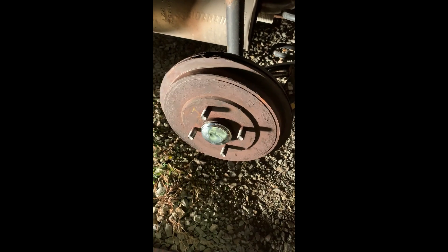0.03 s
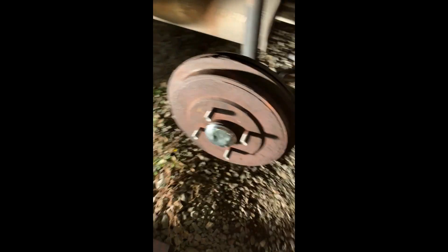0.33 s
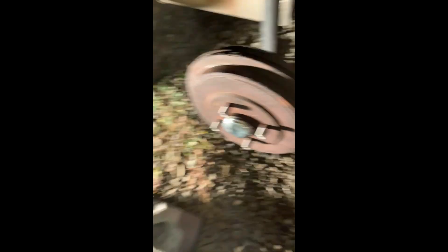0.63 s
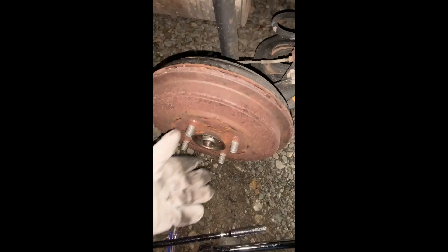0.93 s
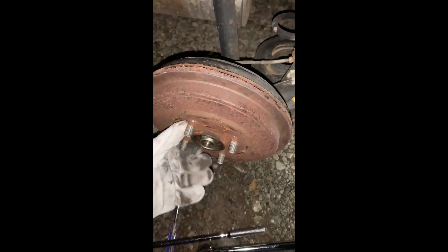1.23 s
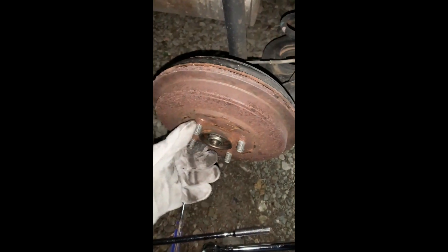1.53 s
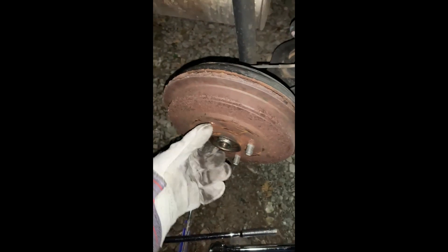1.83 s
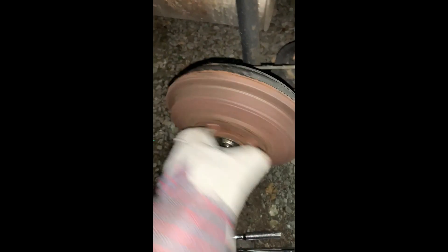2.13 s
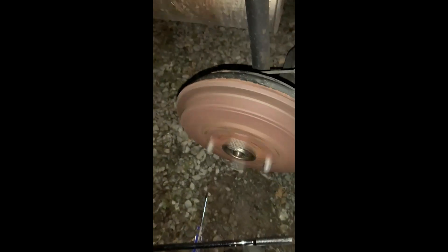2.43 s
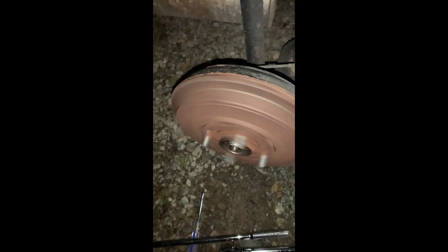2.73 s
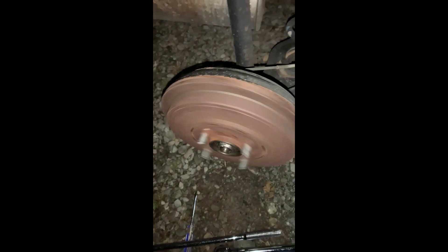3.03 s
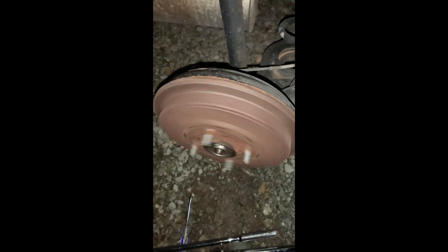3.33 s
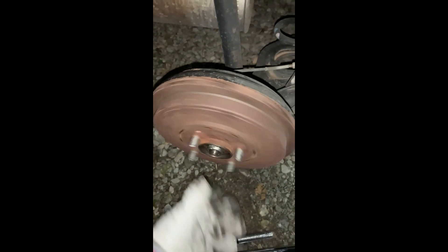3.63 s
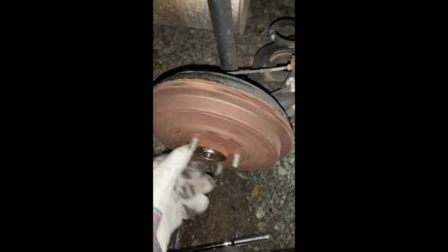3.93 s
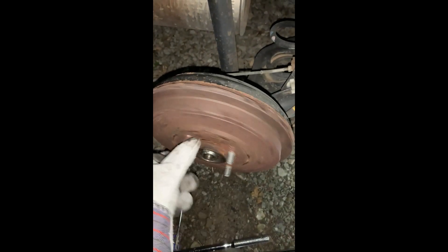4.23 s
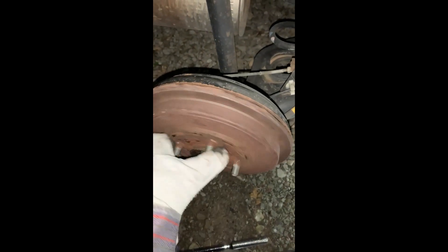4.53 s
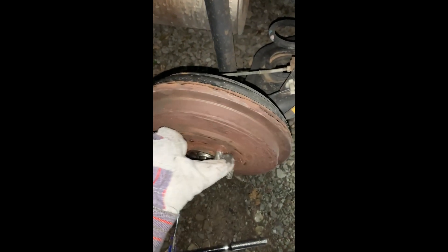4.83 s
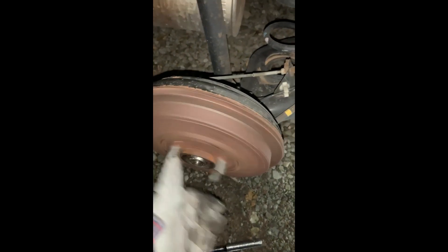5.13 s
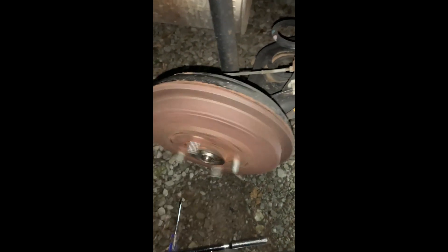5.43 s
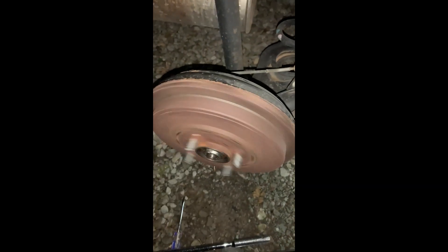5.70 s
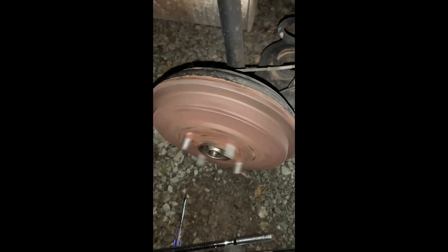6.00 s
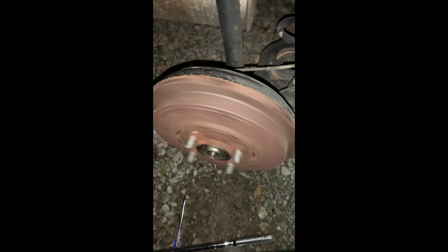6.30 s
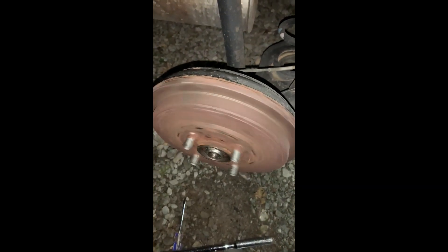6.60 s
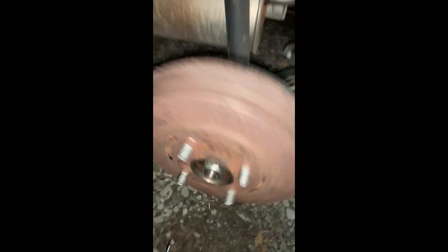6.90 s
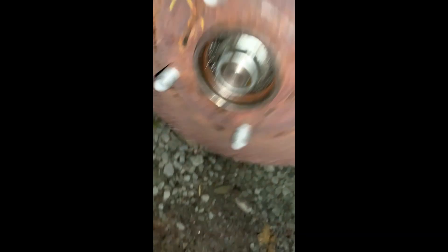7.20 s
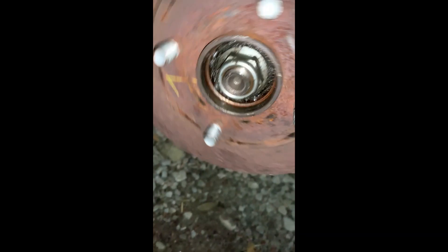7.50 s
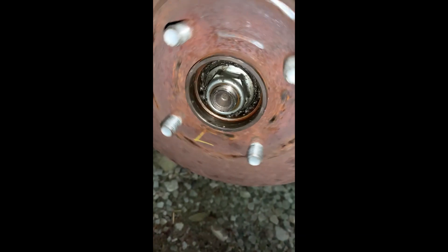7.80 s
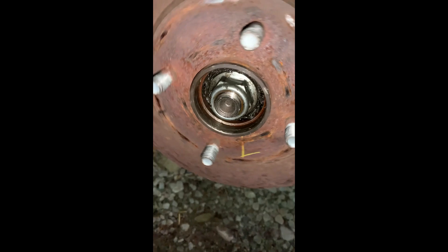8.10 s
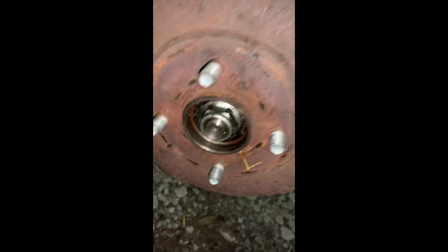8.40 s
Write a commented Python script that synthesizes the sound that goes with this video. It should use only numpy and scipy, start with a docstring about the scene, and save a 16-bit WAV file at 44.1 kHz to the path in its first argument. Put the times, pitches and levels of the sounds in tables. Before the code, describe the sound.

A worn wheel bearing growls and crunches through two fading spins, the brake drum scraping and squeaking between glove rustles.

```python
"""Outdoors, a phone's two microphone ports close to a wheel hub; far off, a drone, traffic and a motor.
A rusty brake drum on a worn bearing is spun twice by hand. The rollers rumble over pitted races,
shake the hub and crunch rust; the drum catches on the brake shoes, rasps, squeaks and rings.
Near the microphone a work glove and sleeve rustle among short clicks; ground and wheel arch scatter
the sound back. Three times the sound cuts out for an instant; near the end the phone is handled."""
import sys
import numpy as np
from scipy import signal
from scipy.fft import rfft, irfft, next_fast_len
from scipy.io import wavfile
from scipy.ndimage import uniform_filter1d

SR = 44100
rng = np.random.default_rng(int(sys.argv[2]) if len(sys.argv) > 2 else 0)


def dump_mix(stems):
    """Bounce the given channels to the path in sys.argv[1] as a 16-bit WAV at rate SR."""
    frames = np.atleast_2d(stems).T  # one column per channel
    limited = np.clip(frames, -1, 1)  # hard clip at full scale
    pcm = np.round(limited * 32767).astype(np.int16)
    wavfile.write(sys.argv[1], SR, pcm)


N = 377055
TIME = np.arange(N) / SR

# Far drone and traffic over time: time_s, drone_db, traffic_db
FAR_LEVELS = [(0, -44.5, -51.5), (.93, -49.5, -56), (1.0, -54.5, -65.5), (4.6, -52, -61),
              (6.599, -50.5, -62.5), (7.899, -49.5, -73), (8.55, -59, -61.5)]
# Colour of the drone: freq_hz, gain_db
DRONE_COLOUR = [(15, -5), (32, -10), (55, -9), (85, -4.5), (140, -9), (200, -15.5), (280, -35),
                (450, -30.5), (800, -73.5)]
# Tones in the drone: pitch_hz, width_hz, boost_db
DRONE_TONES = [(58.35, 4.4, 12.5), (338, 9.7, 13.5)]
# Colour of far traffic: freq_hz, gain_db
TRAFFIC_COLOUR = [(200, 12.5), (400, -5.5), (620, -2), (800, -1), (1100, 1), (1800, -3.5), (2500, -14.5),
                  (5000, -27), (16000, -33)]
# Partials of the far motor: pitch_hz, relative_db
MOTOR_PARTIALS = [(59.2, -54), (118.4, -67), (360.7, -77.5)]
# The motor's hum grows: time_s, gain_db
MOTOR_SWELL = [(0, -11), (4.8, -10), (7.6, 4)]

# The sleeve slides (rise and fall span 20 dB): full_speed_s, rise_s, hold_s, fall_s, hiss_db, swish_db
ARM_MOVES = [(0.522, 0.083, 0.034, 0.11, -49, -64), (0.634, 0.096, 0.045, 0.063, -47, -65),
             (1, 0.033, 0.12, 0.12, -55, -84), (1.754, 0.36, 0.13, 0.18, -67, -68.5),
             (2.153, 0.21, .025, .05, -49.5, -62.5), (2.257, 0.082, 0.13, 0.75, -46, -56),
             (3.571, 0.14, 0.057, 0.49, -47, -55.5), (3.992, 0.015, 0.011, 0.31, -50.5, -81),
             (4.232, 0.021, 0.0086, 0.18, -49.5, -57), (4.612, 0.14, .02, 0.22, -47.5, -57),
             (5.138, 0.16, 0.022, 0.23, -42, -55), (5.332, 0.16, 0.093, 0.35, -46.5, -51.5),
             (6.884, 0.082, 0.18, 0.25, -47.5, -57), (7.147, 0.27, 0.038, 0.26, -41, -49.5),
             (7.381, 0.11, 0.054, 0.13, -53, -59.5), (8.375, 0.21, .2, .2, -47.5, -56.5)]
# Colour of the sleeve's hiss: freq_hz, gain_db
HISS_COLOUR = [(120, 15.5), (350, 3.5), (700, -2), (1300, -5), (2200, 0.5), (4000, 5), (8000, 1),
               (12000, 2.5), (16000, 3)]
# Colour of its dull swish: freq_hz, gain_db
SWISH_COLOUR = [(200, 1), (400, 4.5), (750, -3.5), (1300, 0.5), (1800, -1), (2600, -11), (5000, -17),
                (16000, -41)]
# Short clicks, one sharp as the sound cuts back in: start_s, length_s, body_db, treble_db
CLICKS = [(0.36, 0.046, -62, -58.5), (0.461, 0.013, -56, -66), (0.514, 0.0068, -52, -58),
          (0.588, .0047, -55, -44), (0.636, 0.0076, -56, -62), (0.666, 0.039, -56.5, -72),
          (2.629, 0.011, -58, -45.5), (2.67, 0.012, -44, -41), (2.7295, 0.006, -24, -35.5),
          (2.886, 0.018, -37, -44), (2.91, 0.0015, -55, -39), (3.508, 0.0047, -36, -42),
          (3.617, 0.0044, -53, -41), (3.991, 0.011, -56, -54), (4.028, .006, -53, -43.5),
          (4.052, 0.0014, -56, -50), (4.117, 0.004, -43, -46.5), (4.1227, 0.0058, -29, -33),
          (5.192, 0.0011, -28, -29.5), (6.064, 0.0041, -62, -48), (6.599, 0.0026, -47.5, -46.5),
          (6.683, 0.012, -86, -63.5), (6.859, 0.0072, -54, -48.5), (6.952, 0.0024, -49, -62),
          (7.144, 0.022, -45, -44.5), (7.263, 0.0064, -54, -42.5), (8.129, 0.0033, -54.5, -36.5)]
# Dull knocks of the loose hub and of handling: start_s, pitch_hz, peak_db, t60_s
KNOCKS = [(2.352, 237, -17.5, 0.015), (2.766, 125, -23, 0.11), (3.295, 241, -18.5, 0.031),
          (3.416, 216, -35, 0.091), (5.206, 135, -19.5, 0.13), (6.826, 573, -40.5, 0.052),
          (6.954, 516, -26.5, 0.0068), (6.969, 62, -23.5, 0.11), (8.436, 422, -44, 0.047)]

# The drum sings faintly in the first second: start_s, length_s, pitch_hz, width_hz, level_db
FAINT_TONES = [(0.019, 0.33, 1048, 12.2, -61), (.15, .14, 834, 15, -68), (.15, 0.35, 1560, 52, -70.5),
               (.27, .08, 1140, 66, -66), (.46, .07, 1135, 60, -62), (.57, 0.26, 1125, 50, -63.5),
               (0.782, 0.078, 1050, 20, -63), (0, 0.088, 5520, 120, -70), (0, 0.069, 7100, 300, -69)]
# The drum rubs a shoe (relative levels): start_s, length_s, rasp_db, treble_db, mode_push_db
SCRAPES = [(2.685, 0.055, -31, -28, -56), (2.725, 0.02, -26.5, -41, -54), (2.76, 0.01, -31.5, -37, -40),
           (3.476, 0.014, -45, -37, -48), (3.512, 0.018, -36.5, -36.5, -35.5),
           (3.613, 0.025, -41, -43, -41.5), (5.485, 0.005, -46, -36, -50),
           (5.527, 0.009, -39, -32.5, -35.5), (6.212, 0.027, -34, -37, -40.5),
           (6.273, 0.018, -39, -42.5, -50), (6.308, 0.12, -51, -45.5, -48), (6.383, 0.023, -33, -34.5, -47),
           (6.455, 0.032, -36.5, -39.5, -37.5)]
# Colour of the rasp: freq_hz, gain_db
RASP_COLOUR = [(250, -2.5), (500, -5.5), (780, 0), (1200, 0), (1400, -6), (2300, -0.5), (3000, -4),
               (3900, -6), (5000, -42.5), (9000, -54)]
# Colour of the rasp's treble: freq_hz, gain_db
RASP_TREBLE = [(2500, -60.5), (4200, 21), (7000, 5), (11000, 4.5), (15500, 1)]
# Resonances of shoes and backing plate: pitch_hz, width_hz, boost_db
PLATE_MODES = [(618, 60, 13), (833, 42, 11), (920, 81, 11.5), (1143, 80, 10), (1580, 70, 13), (1915, 80, 7),
               (2130, 70, 4), (2700, 52, 6.5), (3040, 90, 4.4), (3700, 70, 6), (3850, 73, 9.5),
               (4700, 60, 9), (5835, 72, 15), (6280, 79, 13), (7020, 110, 20), (8430, 150, 21),
               (9740, 130, 23), (11177, 100, 10), (12720, 160, 11), (15500, 160, 8)]
# The iron drum is not quite round, so each mode has a twin: pitch_hz, gain_db, t60_s, twin_offset_hz
DRUM_MODES = [(832, -5, .25, 4), (1057, -7, .65, 2), (1437, -12, .82, 1), (1599, -15, .3, 8),
              (1949, -11, .2, 11), (2083, -4, .66, 5.2), (2730, -13, .3, 9), (2848, -12, .35, 9),
              (3040, -7, .12, 30), (3722, -1, .15, 19), (3890, -5, .1, 33), (4735, 0, .11, 14),
              (5831, -9, .13, 4), (6190, -13, .08, 40), (7020, -5, .1, 24), (8323, 0, .09, 16),
              (9709, -7, .09, 18), (11177, -8, .12, 8), (12720, -14, .08, 25), (14346, -7, .09, 12)]
# Friction locks onto one drum mode: start_s, hold_s, pitch_hz, relative_db
SQUEAKS = [(2.685, 0.012, 3722, -29), (2.687, 0.0074, 2083, -38), (2.69, 0.018, 1057, -36.5),
           (2.688, 0.018, 7020, -32), (2.689, .009, 11177, -34.5), (2.727, .012, 4735, -28.5),
           (2.726, 0.013, 11177, -32.5), (2.718, 0.012, 5831, -36.5), (2.732, 0.038, 7020, -39),
           (2.735, 0.0091, 2083, -51.5), (2.771, 0.013, 5831, -40.5), (2.785, 0.02, 2848, -44.5),
           (2.755, .02, 11177, -47), (2.76, .012, 8323, -45), (2.916, .008, 2083, -58),
           (3.481, .012, 4735, -39), (3.482, 0.0067, 2083, -42.5), (3.509, 0.0094, 7020, -38.5),
           (3.516, 0.018, 5831, -40), (3.508, 0.0086, 3040, -36.5), (3.51, 0.011, 8323, -49),
           (3.518, .012, 2083, -48), (3.617, .012, 4735, -33), (3.62, .012, 1437, -57),
           (3.64, .02, 2848, -52), (5.53, 0.0092, 5831, -31), (5.526, 0.012, 9709, -35.5),
           (5.528, .012, 8323, -43), (5.529, 0.0097, 1437, -39.5), (5.53, 0.005, 2083, -36),
           (6.214, 0.026, 8323, -37), (6.217, 0.0098, 1057, -45.5), (6.23, .014, 2083, -46.5),
           (6.221, 0.013, 1437, -47), (6.312, 0.0066, 7020, -48.5), (6.39, 0.028, 14346, -49),
           (6.384, 0.012, 3890, -39), (6.457, .014, 4735, -35), (6.459, 0.018, 14346, -50),
           (6.475, 0.025, 5831, -48.5), (6.49, 0.028, 1437, -46)]

# Grit crackles while the drum turns fast: start_s, length_s, level_db
GRIT_FLURRIES = [(2.995, 0.0078, -55), (3.055, 0.012, -54.5), (3.131, 0.012, -56), (3.219, 0.01, -54.5),
                 (3.244, 0.012, -56), (3.276, 0.012, -55.5), (3.344, 0.011, -58), (3.404, .008, -59),
                 (5.709, 0.013, -52), (5.823, .006, -55), (5.842, 0.0063, -56), (5.923, 0.019, -53),
                 (6.081, 0.011, -53.5)]
# Colour of the grit: freq_hz, gain_db
GRIT_COLOUR = [(1200, -15), (2500, 2), (4500, 3), (6500, -3), (11000, -4.5), (16000, -20)]
# Resonances of the races: pitch_hz, width_hz, boost_db
RACE_MODES = [(4991, 120, 15), (6450, 270, 8.5), (11000, 120, 11)]
# A roller crushes a flake of rust: start_s, length_s, level_db
CRUNCHES = [(2.347, .01, -38.5), (2.365, 0.033, -38.5), (2.418, 0.0081, -43), (2.455, 0.023, -41.5),
            (2.55, 0.016, -41), (2.977, 0.0087, -44), (3.294, 0.0094, -44), (5.259, 0.0079, -41),
            (5.321, 0.029, -42), (5.389, 0.023, -39), (5.449, 0.0072, -44), (5.648, 0.0099, -35),
            (5.712, 0.0088, -34.5), (5.898, 0.017, -35.5), (5.922, 0.015, -32.5)]
# Colour of a crunch: freq_hz, gain_db
CRUNCH_COLOUR = [(250, -15), (450, 4.5), (800, 7), (1300, -8), (2400, -1), (3500, -17.5), (6000, -30.5),
                 (16000, -37.5)]
# The hand spins the drum: full_speed_s, slowing_s, caught_s, rumble_db, shudder_db, fade_db_per_s
SPINS = [(2.24, 2.72, 3.9, -34, -37.5, 12), (5.163, 6.073, 8.2, -32.5, -35, 40.5)]
# Low swells (the bearing growls; near the end the phone is handled): start_s, length_s, level_db
RUMBLE_SWELLS = [(2.238, 0.064, -36.5), (2.333, 0.13, -27.5), (2.45, 0.06, -26), (2.555, 0.028, -27),
                 (2.747, 0.053, -28), (2.866, 0.053, -32), (2.917, 0.045, -28), (2.971, 0.039, -28.5),
                 (3.023, 0.057, -35.5), (3.279, 0.041, -27.5), (3.328, 0.04, -32.5), (3.405, 0.031, -31.5),
                 (3.746, 0.038, -42.5), (5.202, 0.031, -23.5), (5.254, 0.032, -31.5), (5.292, 0.082, -26),
                 (5.399, 0.075, -25), (5.622, 0.062, -28), (5.694, 0.051, -23), (5.837, 0.14, -29),
                 (5.916, 0.046, -23), (6.03, 0.028, -34.5), (6.07, 0.05, -39.5), (6.303, 0.017, -32.5),
                 (6.683, 0.024, -54.5), (7.146, 0.065, -45), (7.244, 0.088, -48.5), (7.411, 0.089, -66)]
# How the hub passes the rumble on: freq_hz, gain_db
HUB_COLOUR = [(90, -11.5), (150, -10.5), (200, -5), (240, -0.5), (300, -6), (345, -15), (400, -13),
              (460, -21.5), (900, -28.5), (1250, -37), (2200, -42), (4000, -53.5), (8000, -82.5),
              (16000, -97.5)]
# Resonances of the hub: pitch_hz, width_hz, boost_db
HUB_MODES = [(228, 36, 6.5), (283, 40, 7), (362.2, 27, 11), (615, 89, 6.5), (832, 27, 10.9), (916, 62, 8.5),
             (1052, 22, 11), (1215, 60, 5.3)]
# Colour of the axle's shudder: freq_hz, gain_db
AXLE_COLOUR = [(15, -47), (28, -24.5), (42, 8), (60, 6.5), (100, 4), (140, 6.5), (168, 3.5), (195, -10),
               (300, -56.5)]

# Phase by which the left microphone port leads the right: freq_hz, lead_rad
PORT_LEAD = [(0, 0), (60, -.2), (250, -.35), (500, -.7), (1100, -1.2), (1550, .9), (2100, 1.45),
             (3400, 1.4), (4750, 3.14), (6500, 6.1), (7300, 6.5), (8950, 9.42), (10700, 12.4),
             (11600, 12.7), (13200, 15.7), (14900, 18.8), (16000, 18.8)]
# Level at the left port minus the right: freq_hz, balance_db
PORT_BALANCE = [(50, -1), (170, 2), (350, 0), (700, -1.5), (1400, -2), (2100, -4), (2800, -0.5), (5000, 0)]
# The sound cuts out: start_s, end_s
DROPOUTS = [(.942, .996), (2.842, 2.864), (2.888, 2.914)]


def undb(db):
    """Decibels to gain."""
    return 10 ** (np.asarray(db) / 20)


def unit(x):
    """Scale to rms 1."""
    return x / np.sqrt(np.mean(x ** 2) + 1e-18)


def smooth(x, first, second):
    """Two moving averages, their sizes in samples."""
    return uniform_filter1d(uniform_filter1d(x, first), second)


def steady(x, span_s):
    """Hold the rms near 1 over the given span, leaving faster flutter."""
    power = smooth(x ** 2, int(span_s * SR), int(span_s * SR / 2))
    return x / np.sqrt(np.abs(power) + 1e-12)


def add(track, start_s, sound):
    """Mix a sound into the track."""
    i = max(int(start_s * SR), 0)
    track[i:i + len(sound)] += sound[:N - i]


def body(x, colour, modes=()):
    """Causal filter of unit power from (freq_hz, gain_db) points and resonances."""
    size = 2 * next_fast_len(N // 2 + SR // 2)
    freq = np.arange(size // 2 + 1) * SR / size
    hz, db = np.transpose(colour)
    curve_db = np.interp(np.log(freq + 1), np.log(hz), db)
    curve_db += sum(boost / (1 + (2 * (freq - pitch) / width) ** 2) for pitch, width, boost in modes)
    cepstrum = irfft(np.log(unit(undb(curve_db))))
    cepstrum[1:size // 2] *= 2  # fold to minimum phase
    cepstrum[size // 2 + 1:] = 0
    return irfft(rfft(x, size) * np.exp(rfft(cepstrum)))[:N]


def grains(count, per_s, spread_db):
    """Random tiny impacts of uneven size, rms 1."""
    hit = rng.random(count) < per_s / SR
    return unit((hit + 0.00085) * rng.standard_normal(count) * undb(spread_db * rng.standard_normal(count)))


def rub(length_s, slips_per_s, release_s, hiss, bite_s=0.0004):
    """A burst of tiny jerks and fine hiss that bites at once and lets go quickly."""
    t = np.arange(int((length_s + 6 * release_s) * SR)) / SR
    press = np.minimum(t / bite_s, 1) * np.exp(-np.maximum(t - length_s, 0) / release_s)
    jerks = grains(len(t), slips_per_s, 2.3) + hiss * rng.standard_normal(len(t))
    return press * steady(jerks, 0.0077)


def ring(hz, t60):
    """A sine decaying from amplitude 1."""
    t = np.arange(int(t60 * SR) + 2) / SR
    return np.sin(2 * np.pi * hz * t) * np.exp(-np.log(1000) * t / t60)


def swell(hold_s, attack_s, release_s):
    """Straight attack, hold, exponential release; top 1."""
    t = np.arange(int((hold_s + 8 * release_s) * SR)) / SR
    return np.minimum(t / attack_s, 1) * np.exp(-np.maximum(t - hold_s, 0) / release_s)


def drone_and_traffic():
    """Far off: a low drone in the centre and a soft, wide wash of traffic."""
    time_s, drone_db, traffic_db = np.transpose(FAR_LEVELS)
    drone = steady(body(rng.standard_normal(N), DRONE_COLOUR, DRONE_TONES), 0.5)
    drone *= undb(np.interp(TIME, time_s, drone_db))
    shared = 0.25 * rng.standard_normal(N)
    traffic = np.array([body(unit(shared + rng.standard_normal(N)), TRAFFIC_COLOUR) for _ in range(2)])
    return drone + traffic * undb(np.interp(TIME, time_s, traffic_db))


def far_motor(waver_hz=0.6):
    """A far motor hums on a slightly wandering pitch."""
    drift = unit(smooth(rng.standard_normal(N), 9000, 9000))
    clock = TIME + waver_hz / MOTOR_PARTIALS[0][0] * np.cumsum(drift) / SR
    hum = sum(undb(db) * np.sqrt(2) * np.sin(2 * np.pi * hz * clock) for hz, db in MOTOR_PARTIALS)
    return hum * undb(np.interp(TIME, *np.transpose(MOTOR_SWELL)))


def wheel_arch(x, t60=0.059, gain_db=-7):
    """Ground and wheel arch scatter the midrange back, differently to each port."""
    t = np.arange(SR // 5) / SR
    echoes = rng.standard_normal((2, len(t))) * np.exp(-np.log(1000) * t / t60) * (t > .0015)
    echoes /= np.sqrt(np.sum(echoes ** 2, axis=1, keepdims=True))
    scattered = body(x, [(100, -19), (300, -32.5), (700, 7), (2500, 3.5), (5000, -4.5), (16000, 2)])
    return undb(gain_db) * signal.fftconvolve(scattered[None], echoes, axes=1)[:, :N]


def sleeve(rest_db=-78, flutter_db=1.36, roundness=1.136):
    """Near the microphone, threads of glove and sleeve slide: a crackling hiss and a dull swish."""
    t = np.linspace(0, N / SR, 4000)
    hiss_power, swish_power = undb(rest_db) ** 2, 0
    for full_s, rise_s, hold_s, fall_s, hiss_db, swish_db in ARM_MOVES:
        off_peak = np.maximum(full_s - t, 0) / rise_s + np.maximum(t - full_s - hold_s, 0) / fall_s
        speed = undb(-20 * off_peak ** roundness)
        hiss_power += (undb(hiss_db) * speed) ** 2
        swish_power += (undb(swish_db) * speed) ** 2
    hiss, swish = (np.interp(TIME, t, np.sqrt(power + 1e-18)) for power in (hiss_power, swish_power))
    flutter = undb(flutter_db * unit(smooth(rng.standard_normal(N), 400, 400)))
    threads = unit(rng.standard_normal(N) + .6 * grains(N, 3000, 4))
    rustle = body(threads * hiss * flutter, HISS_COLOUR)
    return rustle + body(rng.standard_normal(N) * swish, SWISH_COLOUR)


def clicks_and_knocks(rattle_db=-12):
    """Short clicks, each with a brief rattle; hub and hand knock dully."""
    low, high, knocks = np.zeros((3, N))
    for start_s, length_s, body_db, treble_db in CLICKS:
        for share_db, release_s in ((0, .0015), (rattle_db, .012)):
            click = rub(length_s, 2500, release_s, hiss=0.29)
            add(low, start_s, undb(body_db + share_db) * click)
            add(high, start_s, undb(treble_db + share_db) * click)
    for start_s, hz, db, t60 in KNOCKS:
        add(knocks, start_s, undb(db) * ring(hz, t60))
    low = body(low, [(300, -3), (900, 2), (1550, 14.5), (2150, 14), (3000, 9), (4200, 15), (7000, -25.5)])
    high = body(high, [(2000, -9), (3800, 19), (7000, 15.5), (11000, 14.5), (16000, 8)])
    return knocks + low + high


def faint_singing():
    """Light rubbing wakes now one resonance of the drum, now another."""
    out = np.zeros(N)
    for start_s, length_s, hz, width_hz, db in FAINT_TONES:
        touch = swell(length_s, attack_s=0.024, release_s=0.03)
        resonance = ring(hz, t60=np.log(1000) / (np.pi * width_hz))
        tone = signal.fftconvolve(rng.standard_normal(SR + len(touch)), resonance, "valid")
        add(out, start_s, undb(db) * touch * steady(tone[:len(touch)], .1))
    return out


def brake_shoes(treble_trim_db=-2):
    """High spots of the drum drag over the shoes, and the backing plate rasps."""
    rasp, treble = np.zeros((2, N))
    for start_s, length_s, rasp_db, treble_db, _ in SCRAPES:
        jerks = rub(length_s, slips_per_s=900, release_s=0.012, hiss=0.61, bite_s=0.004)
        add(rasp, start_s, undb(rasp_db) * jerks)
        add(treble, start_s, undb(treble_db + treble_trim_db) * jerks)
    return body(rasp, RASP_COLOUR, PLATE_MODES) + body(treble, RASP_TREBLE, PLATE_MODES)


def drum_mode(start_s, hz, t60, offset_hz, hold_s, rough_rad, twin_share=0.55):
    """A mode and its twin, fed unevenly by friction, ring out and beat; top rms 1."""
    t = np.arange(int(hold_s * SR)) / SR
    slips = unit(uniform_filter1d(rng.standard_normal(len(t)), size=90))
    drive = np.sin(2 * np.pi * hz * (t + int(start_s * SR) / SR) + rough_rad * slips)
    tone = signal.fftconvolve(drive, ring(hz, t60) + twin_share * ring(hz + offset_hz, t60))
    return np.sqrt(2) * tone / np.abs(tone).max()


def brake_drum(scrape_gain_db=-4, squeak_gain_db=1.5):
    """Every scrape stirs all modes of the drum; in a squeak the friction locks onto one of them."""
    out = np.zeros(N)
    for start_s, length_s, rasp_db, treble_db, push_db in SCRAPES:
        for hz, db, t60, offset_hz in DRUM_MODES:
            # a dull contact hardly reaches the high modes
            dull_db = 0.85 * min(treble_db - rasp_db + 7.5, 0) * (hz > 3500)
            tone = drum_mode(start_s, hz, t60, offset_hz, length_s, rough_rad=1.86)
            add(out, start_s, undb(scrape_gain_db + push_db + db + dull_db) * tone)
    for start_s, hold_s, squeak_hz, db in SQUEAKS:
        hz, _, t60, offset_hz = min(DRUM_MODES, key=lambda mode: abs(mode[0] - squeak_hz))
        tone = drum_mode(start_s, hz, t60, offset_hz, hold_s, rough_rad=0.97)
        add(out, start_s, undb(squeak_gain_db + db) * tone)
    return out


def grit(cracks_per_s=1100, release_s=0.0076, hiss=0.63):
    """Hard specks pass under the rollers: flurries of fine cracks set the races ringing thinly."""
    cracks = np.zeros(N)
    for start_s, length_s, db in GRIT_FLURRIES:
        t = np.arange(int((length_s + 5 * release_s) * SR)) / SR
        specks = steady(grains(len(t), cracks_per_s, 1.8), 0.011) + hiss * rng.standard_normal(len(t))
        fade = np.exp(-np.maximum(t - length_s, 0) / release_s)
        add(cracks, start_s, undb(db) * specks * fade)
    return body(cracks, GRIT_COLOUR, RACE_MODES)


def rust_flakes():
    """Rust flakes break under the rollers in quick strings of cracks that rattle the backing plate."""
    cracks = np.zeros(N)
    for start_s, length_s, db in CRUNCHES:
        add(cracks, start_s, undb(db) * rub(length_s, slips_per_s=450, release_s=0.0042, hiss=0.5))
    return body(cracks, CRUNCH_COLOUR, PLATE_MODES)


def rumble_levels(rise_db_per_s=210, catch_db_per_s=27, shudder_fade_share=0.51):
    """Strength of rumble and shudder: each spin rises, runs and fades; low swells ride on top."""
    rumble_power, shudder_power = np.zeros((2, N))
    for full_s, slowing_s, caught_s, rumble_db, shudder_db, fade_db_per_s in SPINS:
        hand_db = rise_db_per_s * np.maximum(full_s - TIME, 0)
        hand_db += catch_db_per_s * np.maximum(TIME - caught_s, 0)
        slowed_db = fade_db_per_s * np.maximum(TIME - slowing_s, 0)
        rumble_power += undb(rumble_db - hand_db - slowed_db) ** 2
        shudder_power += undb(shudder_db - hand_db - shudder_fade_share * slowed_db) ** 2
    for start_s, length_s, db in RUMBLE_SWELLS:
        shape = swell(length_s, attack_s=0.009, release_s=0.009)
        jolt_db = -27.5 + 0.31 * db  # each swell lifts the shudder too
        add(rumble_power, start_s, (undb(db) * shape) ** 2)
        add(shudder_power, start_s, (undb(jolt_db) * shape) ** 2)
    return np.sqrt(rumble_power), np.sqrt(shudder_power)


def bearing(rust_db=-31):
    """Rollers drop into pits in the races: the patter rings the hub and shakes the axle; rust crunches."""
    rumble, shudder = rumble_levels()
    patter = grains(N, per_s=1000, spread_db=2) + .35 * rng.standard_normal(N)
    hub = steady(body(patter, HUB_COLOUR, HUB_MODES), 0.047)
    axle = steady(body(grains(N, per_s=400, spread_db=1.9), AXLE_COLOUR), 0.1)
    clusters = unit(smooth(rng.standard_normal(N), 700, 300))
    cracks = grains(N, per_s=3000, spread_db=1.7) * undb(3.4 * clusters)
    colour = [(600, -3), (1500, -4), (2500, 13), (3500, 3.5), (7000, 2.5), (12000, -21.5), (16000, -28)]
    rust = unit(body(cracks, colour, PLATE_MODES[:8]))
    return rumble * (hub + undb(rust_db) * rust) + shudder * axle


def microphone_ports(x):
    """Two microphone ports hear the near sound a little apart in time and level."""
    size = next_fast_len(N + SR // 2)
    spectrum = rfft(x, size)
    hz = np.arange(len(spectrum)) * SR / size
    lead_rad = np.interp(hz, *np.transpose(PORT_LEAD))
    balance_db = np.interp(hz, *np.transpose(PORT_BALANCE))
    to_left = np.exp(.5j * lead_rad) * undb(balance_db / 2)
    return irfft([spectrum * to_left, spectrum / to_left], size)[:, :N]


def scene():
    """The hub close to the microphone, the wheel arch behind it, drone, traffic and motor far off."""
    noises = bearing() + rust_flakes() + grit() + brake_shoes() + clicks_and_knocks() + sleeve()
    near = microphone_ports(noises + brake_drum() + faint_singing())
    return near + wheel_arch(noises) + drone_and_traffic() + far_motor()


def record(dry, low_hz=34, top_hz=15780, dropout_db=-38):
    """The phone drops the deepest bass and cuts the top; three times the sound cuts out briefly."""
    sound = signal.sosfilt(signal.butter(6, low_hz, "highpass", fs=SR, output="sos"), dry)
    dropped = sum((TIME > start_s) & (TIME < end_s) for start_s, end_s in DROPOUTS)
    gain = uniform_filter1d(undb(dropout_db * dropped), size=40)
    return signal.sosfilt(signal.ellip(10, .2, 80, top_hz, fs=SR, output="sos"), sound * gain)


dry = scene()
out = record(dry)
dump_mix(out)
```